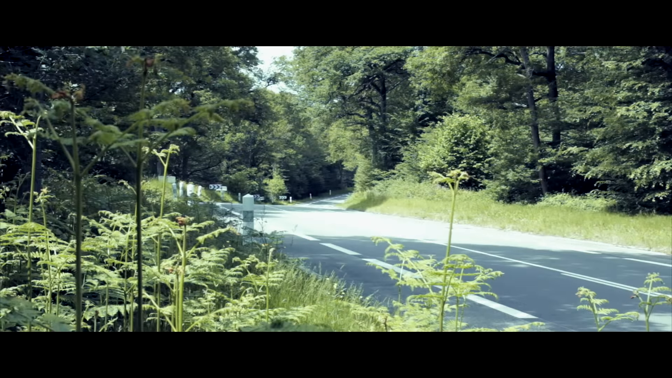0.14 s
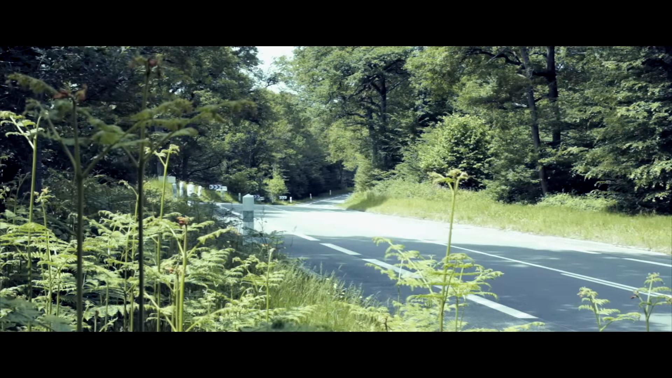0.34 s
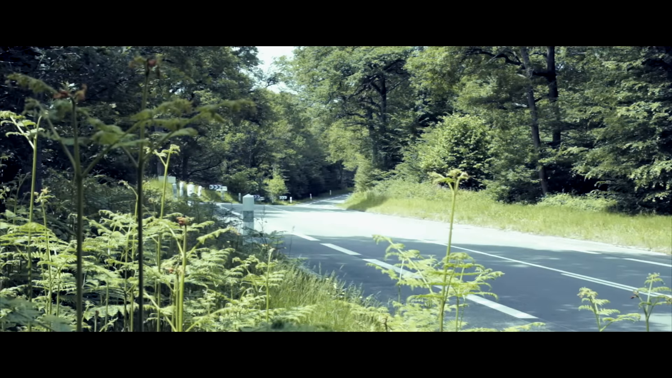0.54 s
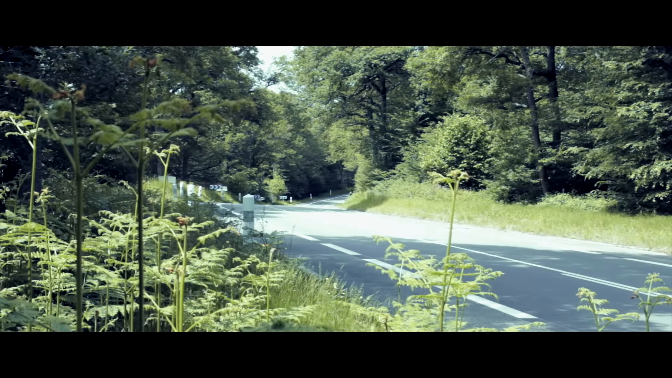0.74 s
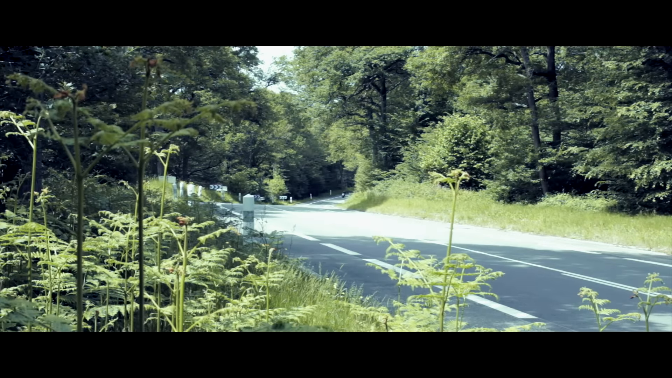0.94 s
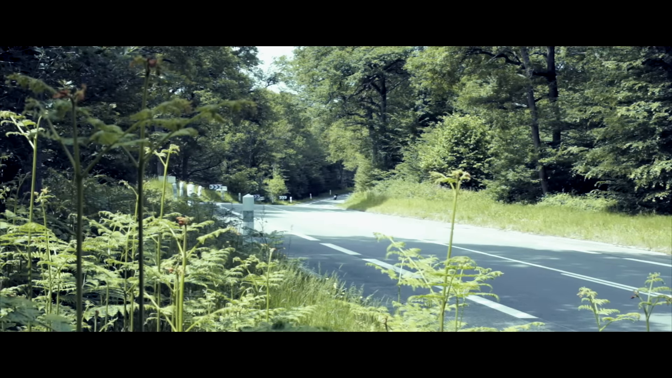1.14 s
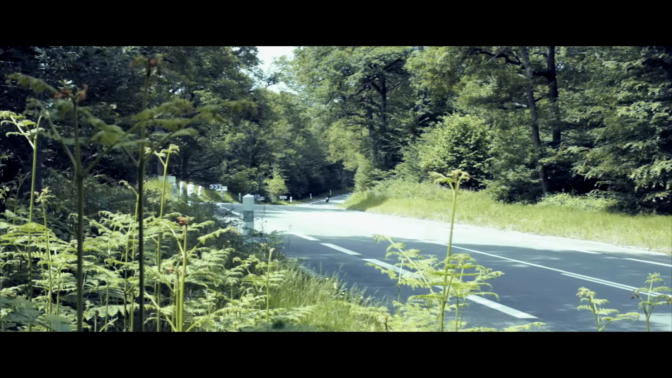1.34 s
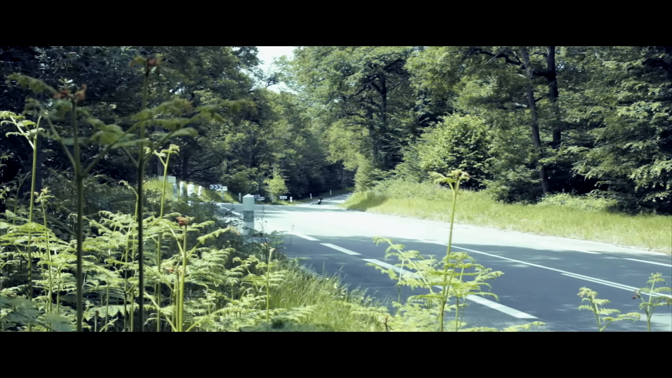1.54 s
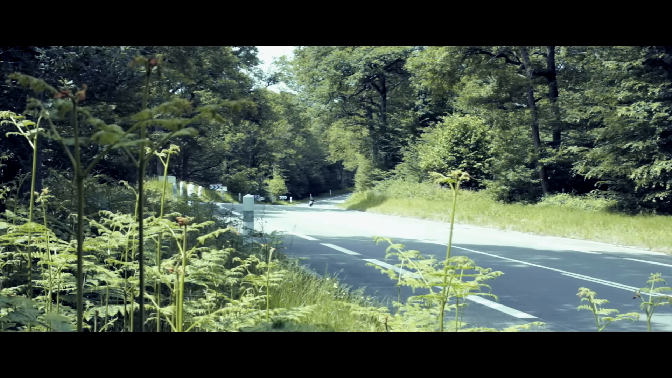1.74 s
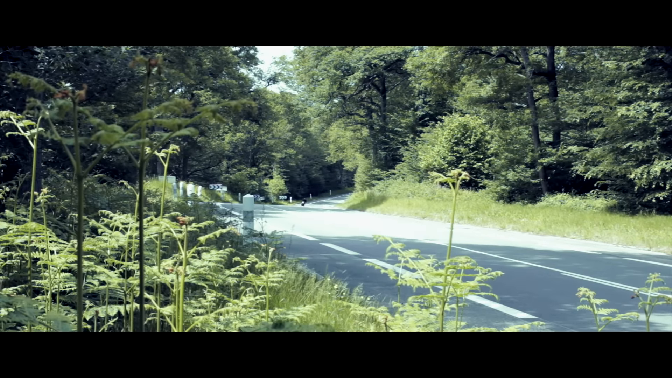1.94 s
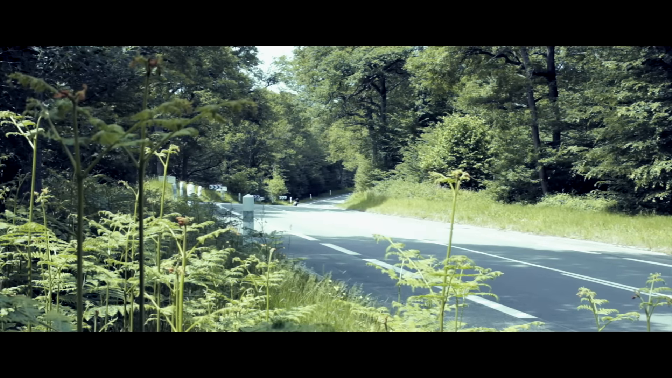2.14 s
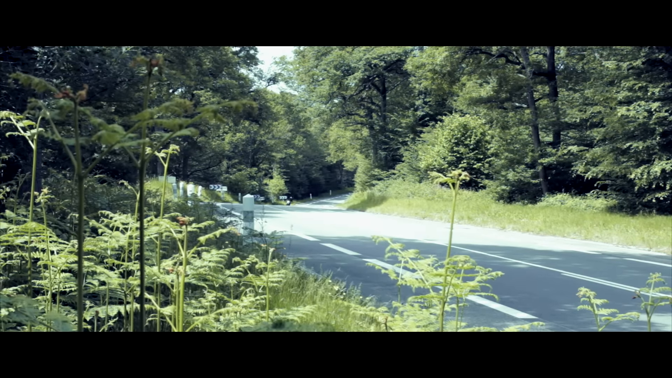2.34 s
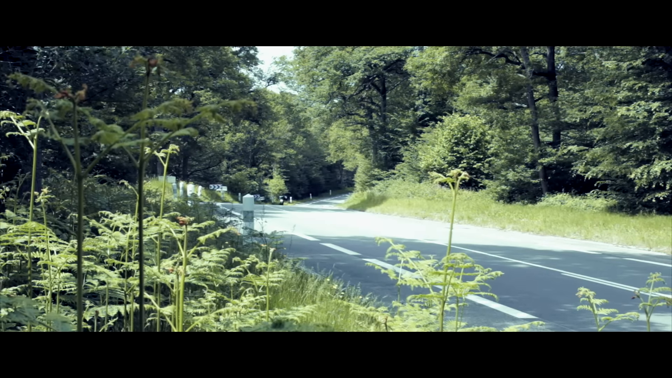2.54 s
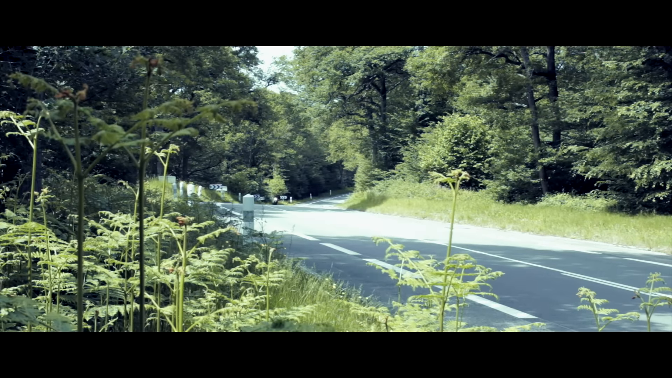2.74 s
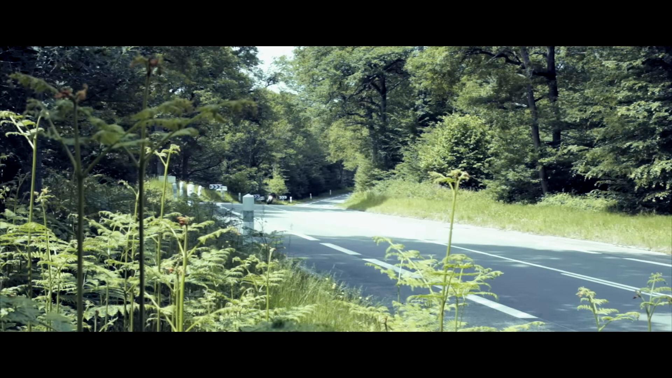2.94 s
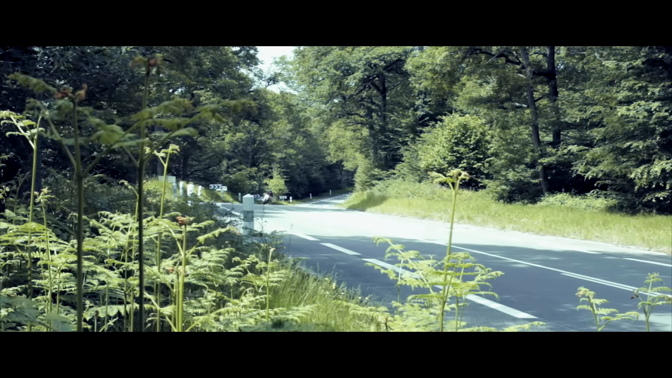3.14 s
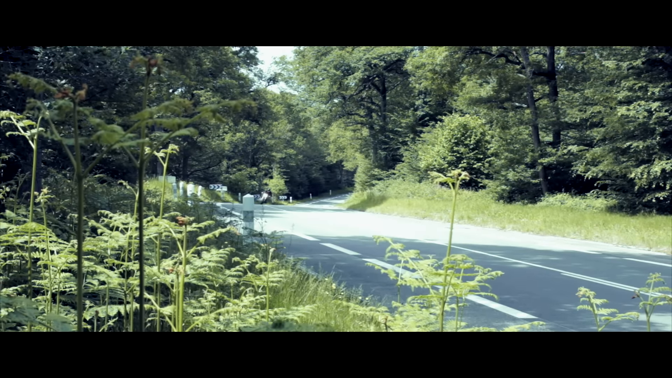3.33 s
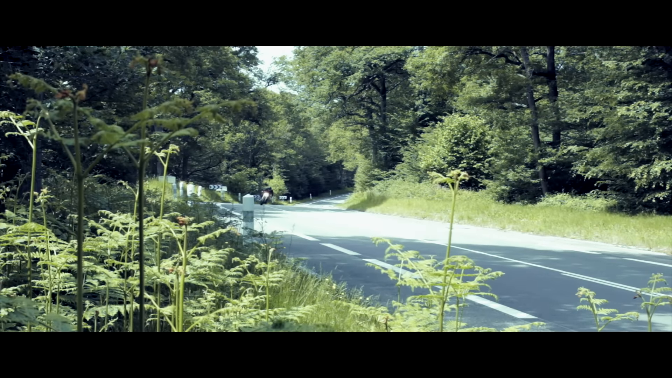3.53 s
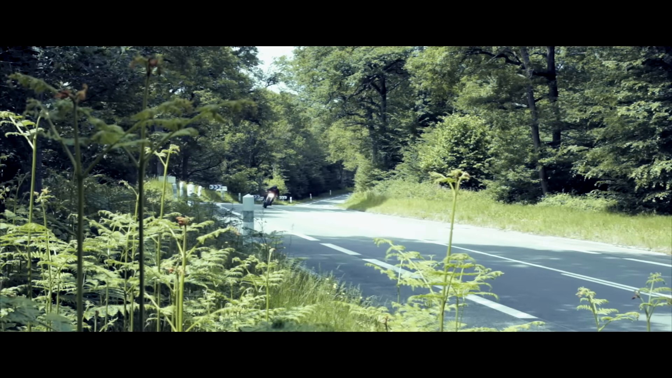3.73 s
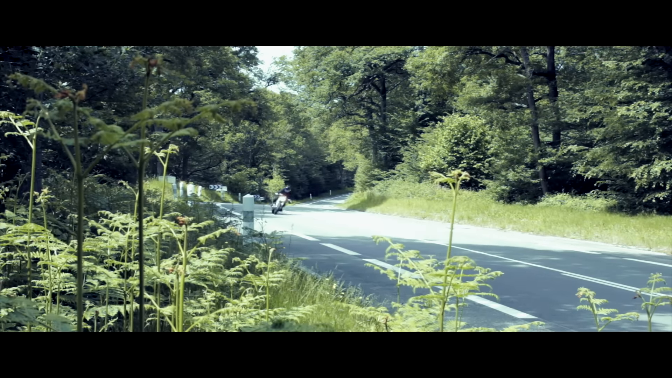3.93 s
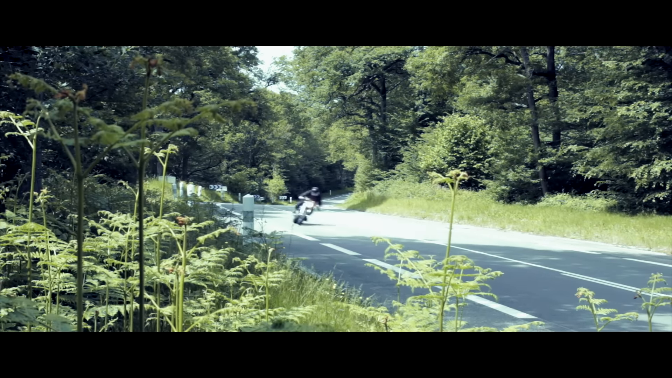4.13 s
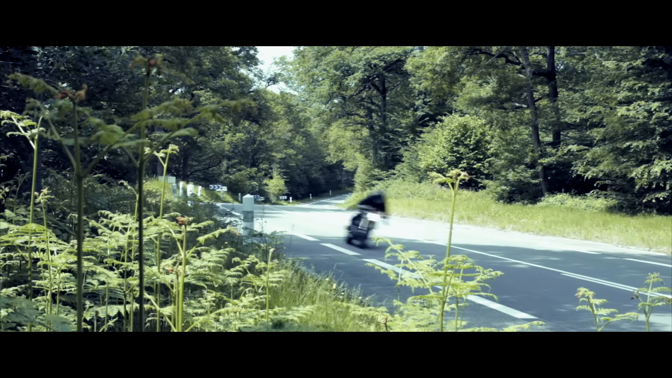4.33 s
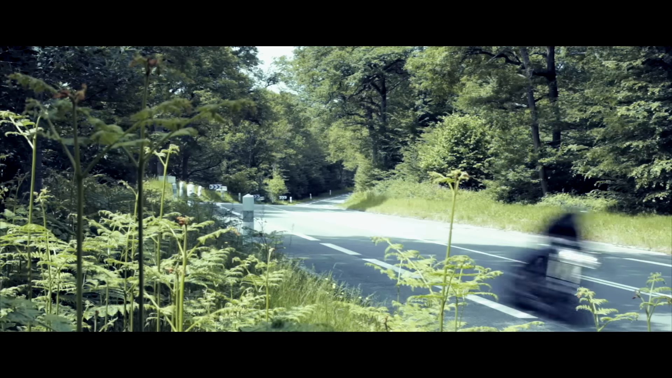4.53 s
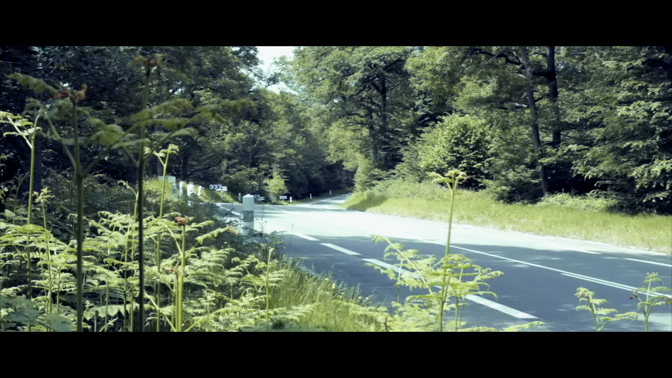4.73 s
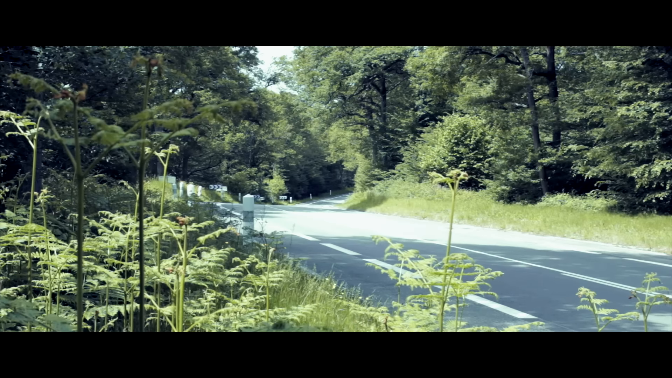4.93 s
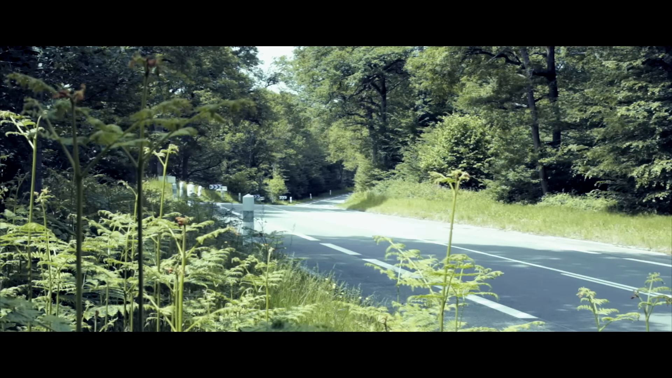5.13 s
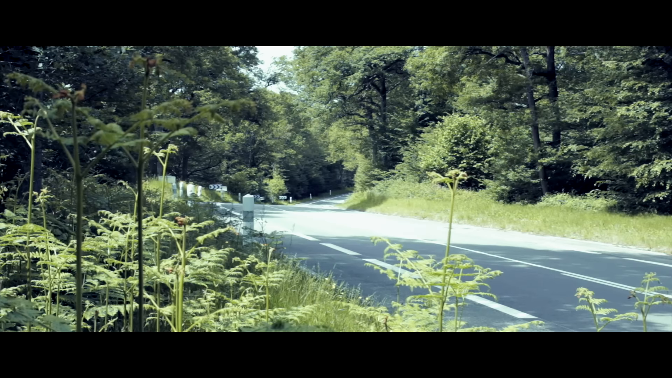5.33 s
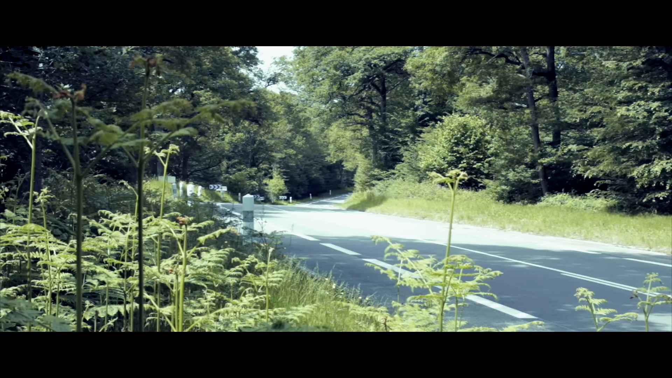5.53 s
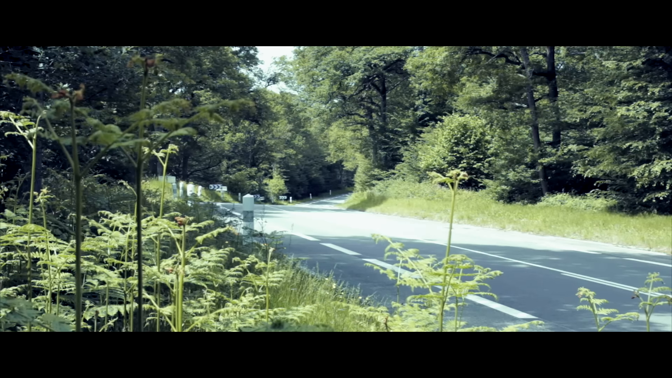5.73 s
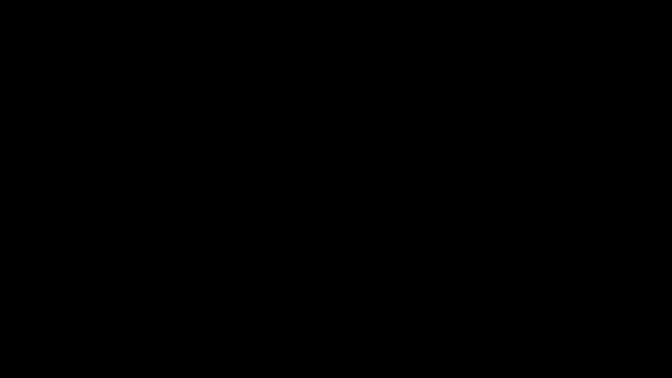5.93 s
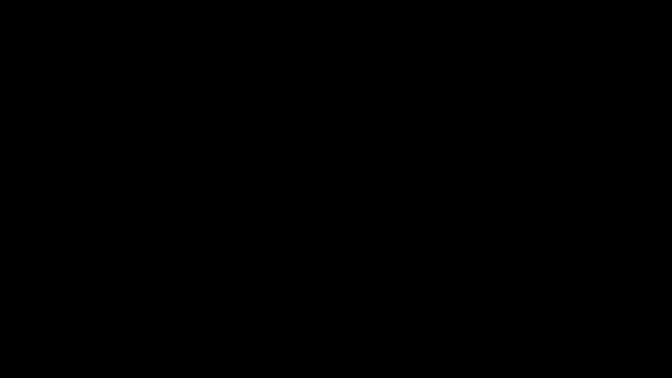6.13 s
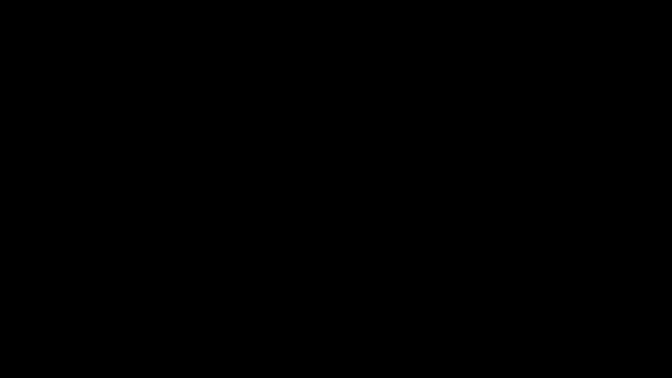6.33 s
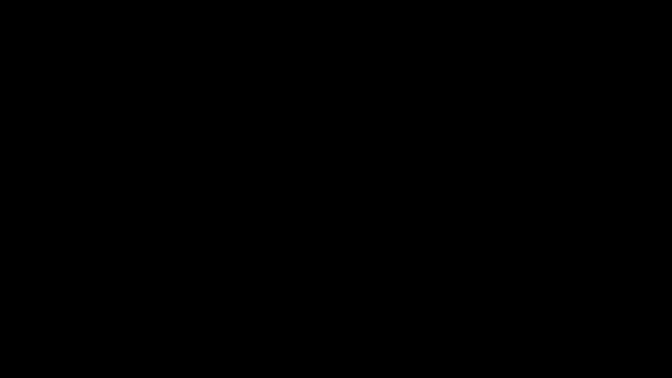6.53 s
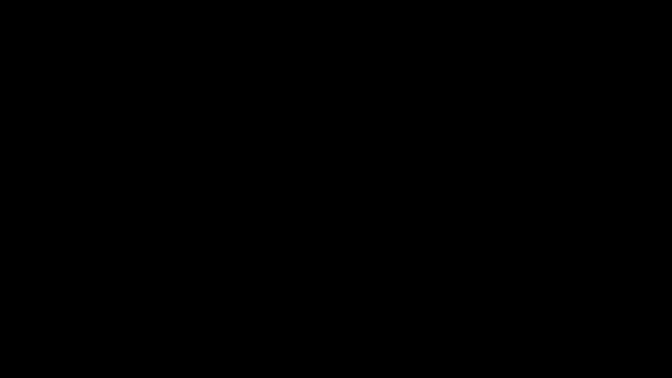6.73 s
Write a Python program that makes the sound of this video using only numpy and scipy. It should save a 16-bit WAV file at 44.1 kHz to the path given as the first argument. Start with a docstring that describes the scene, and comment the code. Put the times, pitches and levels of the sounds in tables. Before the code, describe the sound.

A twin-cylinder motorcycle drones in the distance over the low hush of woods, heard from the roadside with a light echo from the trees. A small, far bird gives a few faint rising whistles in the first 2.5 seconds. The engine holds a nearly steady pitch, its bark softening around 0.5 to 1 second, where the low boom briefly swells, and again near 2.5 seconds. From about 3 seconds it grows steadily louder, an uneven, throbbing exhaust roar mixed with rushing air. At about 5 seconds it passes very close at high speed, overloading the microphone into harsh distortion, with a brief hiss of tyres and chain and a sharp drop in pitch. A few small exhaust cracks come around 5.8 seconds. The lower, duller drone recedes quickly and fades to almost nothing by about 7 seconds.

```python
"""A V-twin motorcycle comes down a forest road at speed, passes 2.3 m from the microphone and rides off.
Its uneven firings ring the exhaust and pump a rush of air; the beat drops in pitch as it goes by,
and up close it overloads the microphone into hard clipping. The trees scatter the sound,
a small bird calls in the distance, and the level fades from the pass onward."""
import sys
import numpy as np
from scipy import signal
from scipy.fft import rfft, irfft, next_fast_len
from scipy.io import wavfile
from scipy.ndimage import map_coordinates

SR = 44100
rng = np.random.default_rng(int(sys.argv[2]) if len(sys.argv) > 2 else 0)


def persist_wave(psi):
    """Save psi, clipped to +-1, as 16-bit WAV."""
    counts = np.round(np.clip(psi, -1, 1) * 32767).astype(np.int16)
    wavfile.write(sys.argv[1], SR, np.atleast_2d(counts).T)


N = 302967
TIME = np.arange(N) / SR
SPEED_M_PER_S, SOUND_M_PER_S = 46.28, 343
PASS_S, PASS_M = 5.079, 2.3  # closest approach to the microphone

# relative strength with the microphone ahead of or behind the machine: boom_db, bark_db, rush_db
FAR_AHEAD_LEVELS = (28.3, 30.6, 16.9)
CLOSE_AHEAD_LEVELS = (28.9, 33, 17.6)
CLOSE_BEHIND_LEVELS = (28.3, 11, 6.3)
FAR_BEHIND_LEVELS = (31.3, 30, 13)


def amp(db):
    """Decibels to gain."""
    return 10 ** (np.asarray(db) / 20)


def unit(x):
    """x at rms 1."""
    return x / np.sqrt(np.mean(x ** 2) + 1e-20)


def along(points, hz):
    """Rows of frequency_hz, value, read on a log frequency axis."""
    point_hz, values = np.transpose(points)
    return np.interp(np.log(hz + 1), np.log(point_hz + 1), values)


def curve(rows):
    """Rows of time_s, value, read at every sample."""
    return np.interp(TIME, *np.transpose(rows))


def wobble(knots_per_s):
    """A smooth random curve."""
    knots = rng.standard_normal(int(N * knots_per_s / SR) + 4)
    return map_coordinates(knots, [TIME * knots_per_s])


def filtered(x, response):
    """x through a zero-phase filter with gain response(hz)."""
    size = next_fast_len(N + SR // 2)
    return irfft(rfft(x, size) * response(np.fft.rfftfreq(size, 1 / SR)), size)[:N]


def noise(spectrum, throb=1):
    """Coloured noise of rms 1, optionally throbbing before it is coloured."""
    return unit(filtered(throb * rng.standard_normal(N), lambda hz: amp(along(spectrum, hz))))


def woods():
    """The low, steady hush of the woods around the microphone."""
    # colour of the hush: frequency_hz, level_db
    hush_colour = [(20, 8), (45, 3.5), (90, 12), (300, 8.5), (1000, 10.5), (2500, -17.5), (3700, -23.5),
                   (4700, -41), (7000, -40), (15500, -39)]
    return amp(-37.5) * noise(hush_colour)


def bird():
    """A small, distant bird: short slurred whistles that swell and fade."""
    # whistles: start_s, length_s, start_hz, end_hz, level_db
    calls = [(.27, .11, 3120, 3750, -48), (.46, .08, 4150, 4350, -60), (.59, .05, 4350, 4250, -61),
             (1.24, .12, 3130, 3750, -51), (2.23, .11, 3150, 3700, -51)]
    out = np.zeros(N)
    for start_s, length_s, start_hz, end_hz, level_db in calls:
        progress = np.linspace(0, 1, int(length_s * SR))
        pitch_hz = start_hz + (end_hz - start_hz) * progress ** 2
        whistle = np.sin(np.pi * progress) * np.sin(2 * np.pi * np.cumsum(pitch_hz) / SR)
        out[round(start_s * SR):][:len(whistle)] += amp(level_db) * whistle
    return out


def forest_echo(x):
    """Trunks scatter a diffuse tail that changes as the source moves: a new one every half second."""
    # reverberation among the trees: frequency_hz, t60_s
    decay_times = [(100, 0.17), (600, 1), (2000, 0.34), (6000, 0.35)]
    out = np.zeros(N)
    for centre_s in np.arange(0, N / SR + .5, .5):
        hz, t, scatter = signal.stft(rng.standard_normal(SR // 2), SR, nperseg=256)
        decay = amp(-60 * t / along(decay_times, hz)[:, None])
        tail = signal.istft(scatter * decay, SR, nperseg=256)[1]
        crossfade = np.sqrt(np.clip(1 - 2 * abs(TIME - centre_s), 0, 1))
        out += signal.oaconvolve(x * crossfade, tail / np.linalg.norm(tail))[:N]
    return out


def ride():
    """A straight, steady pass: distance (m) and bearing (-1 coming, +1 going) as the sound arrives."""
    since_pass_s = np.linspace(-2 * PASS_S, PASS_S, N)
    road_m = SPEED_M_PER_S * since_pass_s
    arrival_s = PASS_S + since_pass_s + (np.hypot(road_m, PASS_M) - PASS_M) / SOUND_M_PER_S
    heard_at_m = np.interp(TIME, arrival_s, road_m)
    distance = np.hypot(heard_at_m, PASS_M)
    return distance, heard_at_m / distance


def perspectives(distance, bearing, close_ahead_m=100, close_behind_m=19):
    """Shares heard from far ahead, close ahead, close behind and far behind; they sum to 1."""
    behind = 1 / (1 + np.exp(-(bearing - .3) / .2))
    close_ahead = 1 / (1 + (distance / close_ahead_m) ** 6)
    close_behind = 1 / (1 + (distance / close_behind_m) ** 6)
    return np.array([(1 - behind) * (1 - close_ahead), (1 - behind) * close_ahead,
                     behind * close_behind, behind * (1 - close_behind)])


def carried(distance, bearing, verge_db_per_m, verge_m, shut_db, abeam_db):
    """Gain in dB: spreading, the overgrown verge on approach, a shut throttle, less sound sideways."""
    # the rider rolls off twice, then opens up for good: time_s, opening (0-1)
    throttle = [(0, .62), (.37, .55), (.52, .06), (.85, .06), (1.2, .24), (1.48, .78), (1.85, .71),
                (2.01, .8), (2.25, .5), (2.33, .03), (2.6, 0), (2.71, .57), (2.98, .91), (3.6, 1)]
    verge_loss = verge_db_per_m * np.clip(-bearing * distance, 0, verge_m)
    throttle_loss = shut_db * (1 - curve(throttle))
    return -20 * np.log10(distance) - verge_loss - throttle_loss - abeam_db * PASS_M / distance


def cracks(t60_s=.0061):
    """Unburnt fuel snaps in the pipe just after the pass."""
    # exhaust cracks: start_s, level_db
    snaps = [(5.757, -19), (5.763, -16.5), (5.868, -22.5)]
    out = np.zeros(N)
    t = np.arange(SR // 50) / SR
    for start_s, level_db in snaps:
        out[round(start_s * SR):][:len(t)] += amp(level_db - 60 * t / t60_s) * rng.standard_normal(len(t))
    return out


def road_reflection(distance, lead_s=.017, lowest_hz=944.6, width_hz=200, peak_db=11, fall_db_per_m=9):
    """The road reinforces one band of the roar, lowest and loudest as the machine's front goes by."""
    front_m = np.interp(TIME + lead_s, TIME, distance)
    centre_hz = lowest_hz * (front_m / PASS_M) ** .65
    phase = 2 * np.pi * np.cumsum(centre_hz) / SR
    band = wobble(width_hz) * np.cos(phase) + wobble(width_hz) * np.sin(phase)
    return amp(peak_db - fall_db_per_m * (front_m - PASS_M)) * unit(band)


def rush(pulses, distance, bearing, shares, gush_s=.0062):
    """Rushing air that throbs as each firing drives a gush of gas, and the hiss of tyres and chain."""
    # colour of the air, then of the hiss: frequency_hz, level_db
    air_colour = [(30, -12), (150, 0), (600, 6), (1100, 3), (1500, 1.5), (2200, -3), (2800, -9.5),
                  (3600, -6), (4300, -21.5), (5500, -34), (8000, -48), (15000, -69.5)]
    hiss_colour = [(500, -30), (3000, 6), (6000, -4.5), (15000, -21.5)]
    rush_db = [FAR_AHEAD_LEVELS[2], CLOSE_AHEAD_LEVELS[2], CLOSE_BEHIND_LEVELS[2], FAR_BEHIND_LEVELS[2]]
    path_db = carried(distance, bearing, verge_db_per_m=.055, verge_m=280, shut_db=5, abeam_db=5)
    gain = (amp(rush_db) @ shares) * amp(path_db)
    gush = unit(signal.lfilter([1], [1, -np.exp(-1 / (gush_s * SR))], pulses))
    air = noise(air_colour, throb=1 + .66 * gush) * gain * amp(3.5)
    # the hiss does not carry from far ahead; it flares as the wheels go by
    hiss_gain = (1 - shares[0]) * gain * amp(-19) + amp(-2.5) * (PASS_M / distance) ** 2.1
    return air + noise(hiss_colour) * hiss_gain


def firings(cycles, lag=.346, echo_lag=.128, jitter=.0015, second_db=-1.5, scatter_db=1.8, echo_gain=.2):
    """Two uneven blow-downs a cycle, each reflected in the pipe; lags and jitter are in cycles."""
    cycle = np.arange(int(cycles[-1]))[:, None]
    chance = rng.standard_normal((len(cycle), 4))
    when = (cycle + [0, lag] + jitter * chance[:, :2]).ravel()
    size = amp([0, second_db] + scatter_db * chance[:, 2:]).ravel()
    at = np.interp(np.r_[when, when + echo_lag], cycles, np.arange(N))
    size = np.r_[size, echo_gain * size]
    whole, part = at.astype(int), at % 1  # each pulse is shared between two samples
    pulses = np.bincount(whole, size * (1 - part), N + 1) + np.bincount(whole + 1, size * part, N + 1)
    return pulses[:N]


def pipe_ring(pulses, colour, size=8192):
    """Pulses ring the pipe: a minimum-phase filter that falls away above the colour's last point."""
    hz = np.fft.rfftfreq(size, 1 / SR)
    gain = amp(along(colour, hz)) / (1 + (hz / colour[-1][0]) ** 6)
    cepstrum = irfft(np.log(gain))
    cepstrum[1:size // 2] *= 2
    cepstrum[size // 2 + 1:] = 0
    return signal.fftconvolve(pulses, irfft(np.exp(rfft(cepstrum))))[:N]


def exhaust(pulses, distance, bearing, shares, swell_s=.95, swell_db=4.2):
    """A low boom and a bark that follows the throttle more, both coloured by the perspective."""
    # colour of one exhaust pulse from each microphone position: frequency_hz, level_db
    far_ahead = [(30, -39), (68, -9), (135, -0.5), (205, -6), (275, 3), (340, 5), (410, -0.5), (545, 2),
                 (620, -1), (750, 0.5), (1000, -5), (1170, -3.5), (1400, -17.5), (2400, -27.5)]
    close_ahead = [(30, -27.5), (70, -10), (140, -1.5), (210, -2), (280, 1.5), (350, 0), (420, -3),
                   (540, -2.5), (630, 3.5), (760, -1.5), (1020, 2.5), (1220, -1), (1500, -10),
                   (2700, -15.5)]
    close_behind = [(25, -12), (54, -3), (108, -4.5), (162, 1), (216, 0), (270, 1.5), (325, 1), (400, -7.5),
                    (500, -15), (1000, -22.5), (2600, -39)]
    far_behind = [(25, -28), (54, -10), (108, -2), (162, -2.5), (216, -5), (270, -0.5), (325, 2.5),
                  (380, 2.5), (435, 1), (490, 0), (650, -20), (920, -11.5), (1090, -9), (1400, -20.5),
                  (2400, -24)]
    # colour, levels, split_hz between boom and bark
    sides = [(far_ahead, FAR_AHEAD_LEVELS, 500), (close_ahead, CLOSE_AHEAD_LEVELS, 500),
             (close_behind, CLOSE_BEHIND_LEVELS, 405), (far_behind, FAR_BEHIND_LEVELS, 405)]
    boom_db = carried(distance, bearing, verge_db_per_m=.075, verge_m=115, shut_db=5.5, abeam_db=7)
    swell_width_s = np.where(TIME < swell_s, .07, .2)
    boom_db += swell_db * np.exp(-((TIME - swell_s) / swell_width_s) ** 2)  # the distant boom swells once
    bark_db = carried(distance, bearing, verge_db_per_m=.06, verge_m=280, shut_db=18, abeam_db=23)
    bark_db += 1.3 * shares[0] * wobble(15)  # moving air makes the far sound flutter
    out = np.zeros(N)
    for share, (colour, levels, split_hz) in zip(shares, sides):
        body = pipe_ring(pulses, colour)
        body -= body.mean()
        boom = filtered(body, lambda hz: 1 / (1 + (hz / split_hz) ** 10))
        bark = body - boom
        out += share * (amp(boom_db + levels[0]) * unit(boom) + amp(bark_db + levels[1]) * unit(bark))
    return out


def motorcycle(distance, bearing, misfire_s=1.88):
    """Doppler-shifted V-twin firings drive the exhaust and the rush of air; one cycle misfires."""
    # engine speed at the machine: time_s, cycles_per_s
    engine_speed = [(0.0, 59.77), (0.15, 59.95), (0.8, 58.99), (1.28, 58.52), (1.75, 58.83), (2.25, 58.96),
                    (2.55, 58.1), (2.95, 58.22), (3.5, 59.41), (4.0, 60.76), (4.3, 60.86), (4.45, 61.36),
                    (4.8, 61.45), (5.3, 61.2), (5.8, 61.14), (6.87, 62.4)]
    doppler = 1 / (1 + bearing * SPEED_M_PER_S / SOUND_M_PER_S)
    cycles = np.cumsum(curve(engine_speed) * doppler) / SR
    misfire = np.exp(-((TIME - misfire_s) / .009) ** 2)
    pulses = firings(cycles) * (1 - misfire)
    shares = perspectives(distance, bearing)
    roar = road_reflection(distance)
    return exhaust(pulses, distance, bearing, shares) + rush(pulses, distance, bearing, shares) + roar


def scene():
    """From the roadside, in mono: the machine and the bird, their echo in the trees, the quiet woods."""
    distance, bearing = ride()
    direct = motorcycle(distance, bearing) + cracks() + bird()
    # the closer the machine, the more the direct sound outweighs the trees
    nearness = 1 / np.hypot(1, distance / 35)
    echo = forest_echo(direct * amp(-3 - 21.5 * nearness))
    return (direct + echo + woods())[None]


def record(dry):
    """The microphone input blocks DC and overloads hard; a straight fade and a treble cut follow."""
    ceiling, top_hz = .44, 15850
    fade_zero_s, fade_length_s = 7.12, 2.08
    dc_block = lambda hz: hz ** 2 / (hz ** 2 + 10 ** 2)
    mic = filtered(dry[0], dc_block)
    clipped = mic / (1 + np.abs(mic / ceiling) ** 20) ** (1 / 20)
    fade = np.clip((fade_zero_s - TIME) / fade_length_s, 0, 1)
    return filtered(clipped * fade, lambda hz: dc_block(hz) * (hz < top_hz))[None]


dry = scene()
out = record(dry)
persist_wave(out)
```